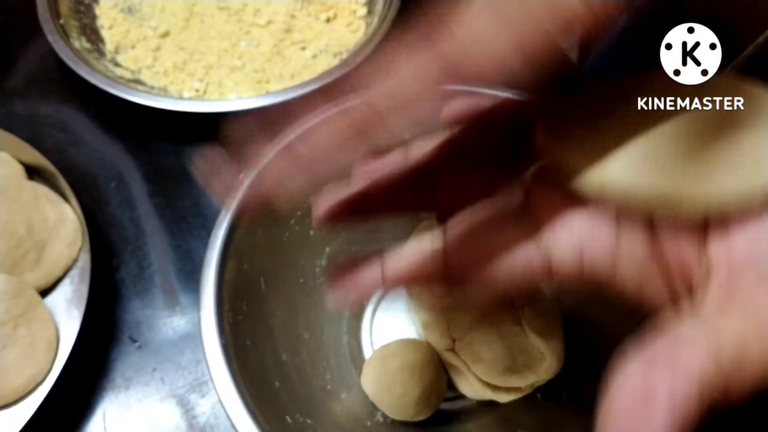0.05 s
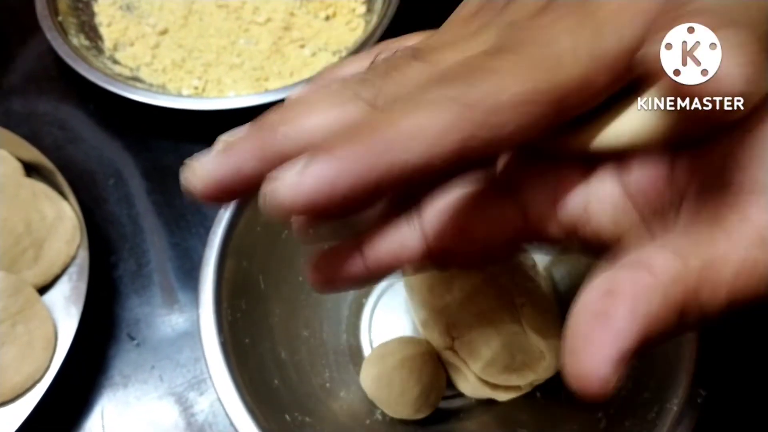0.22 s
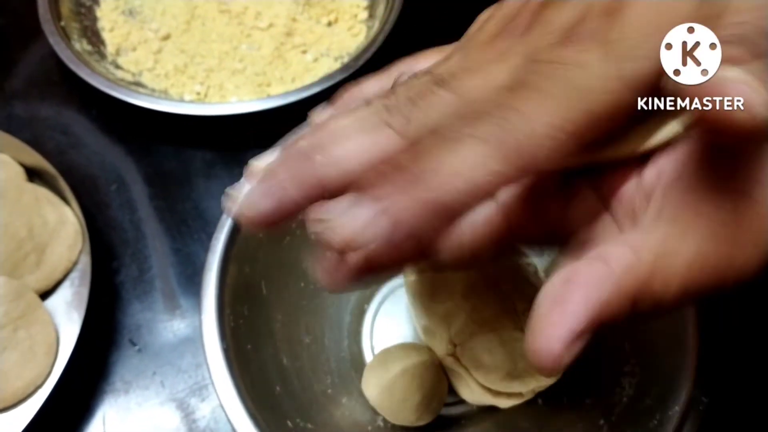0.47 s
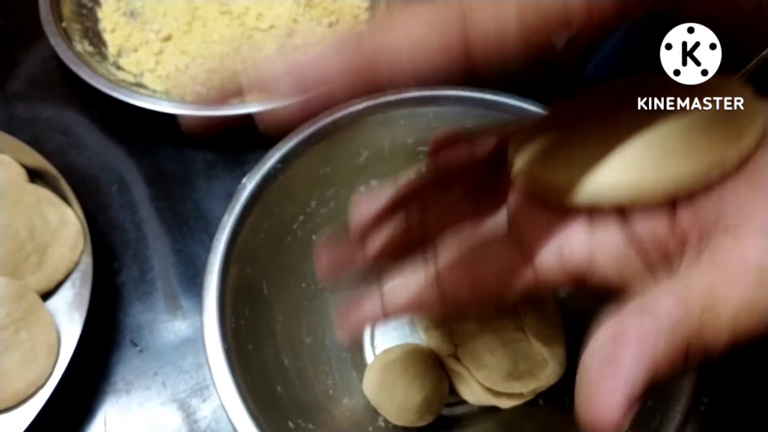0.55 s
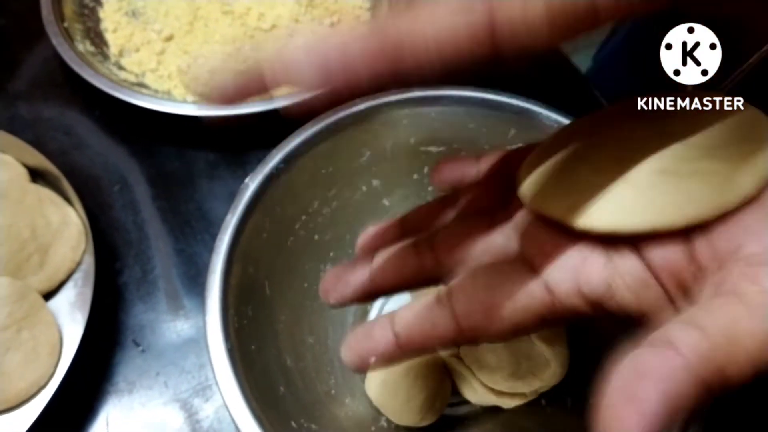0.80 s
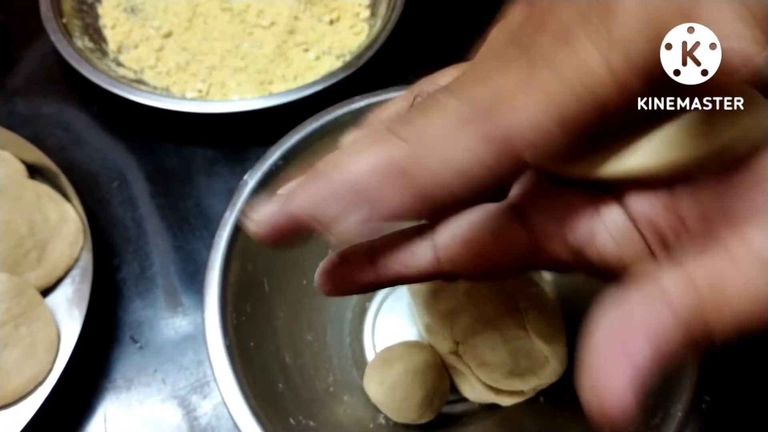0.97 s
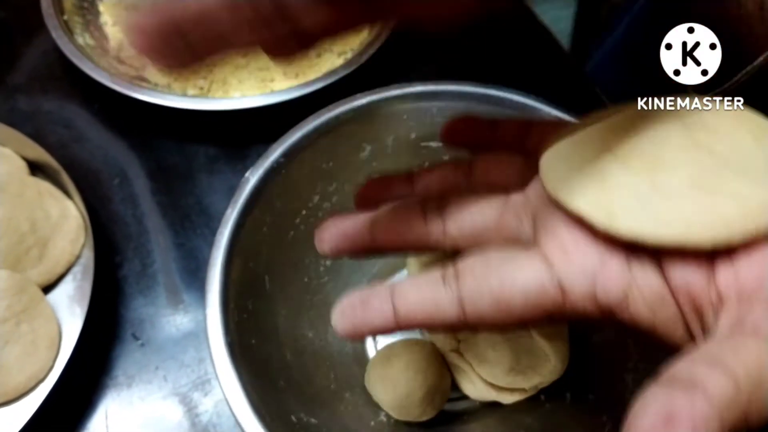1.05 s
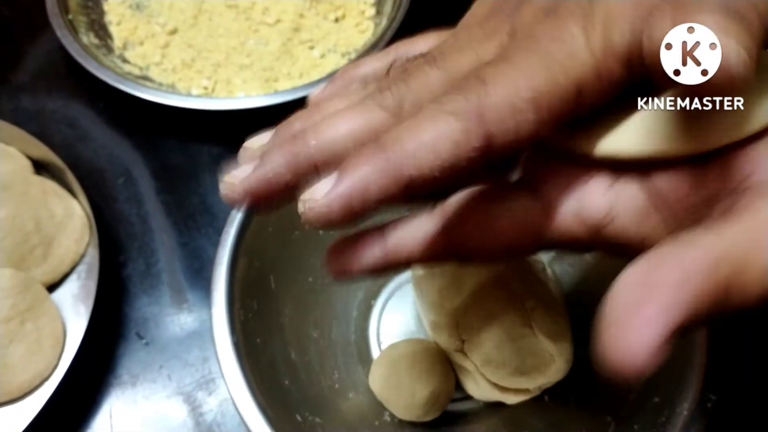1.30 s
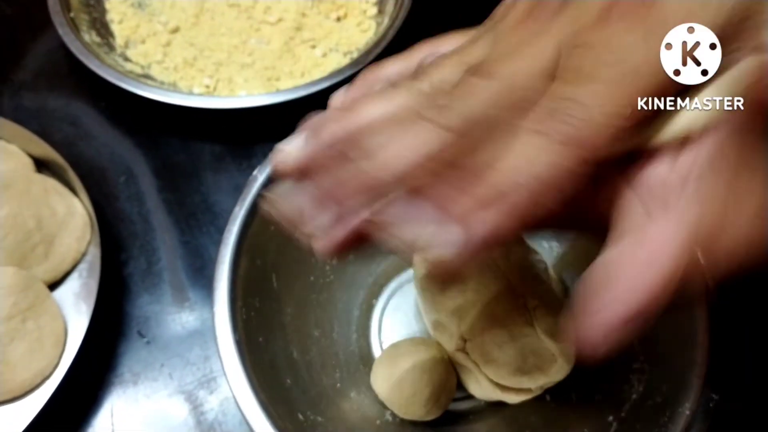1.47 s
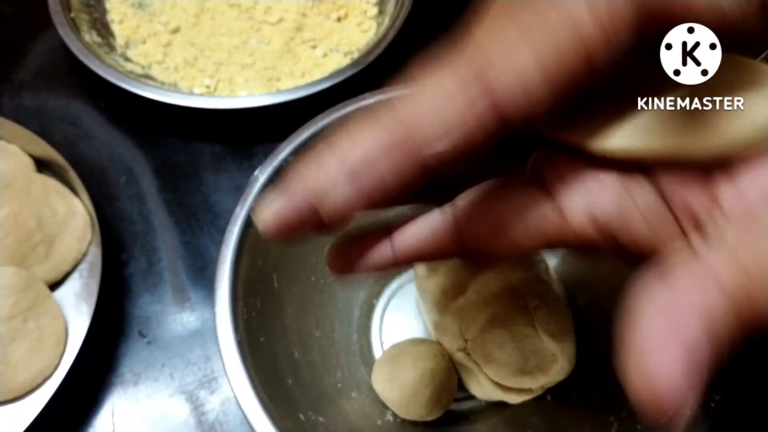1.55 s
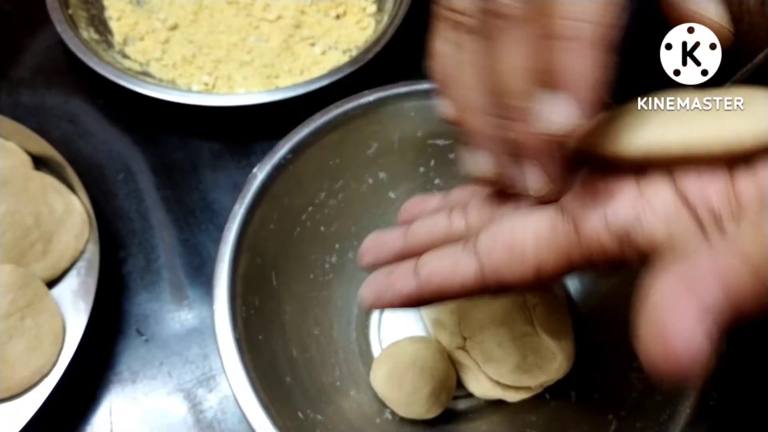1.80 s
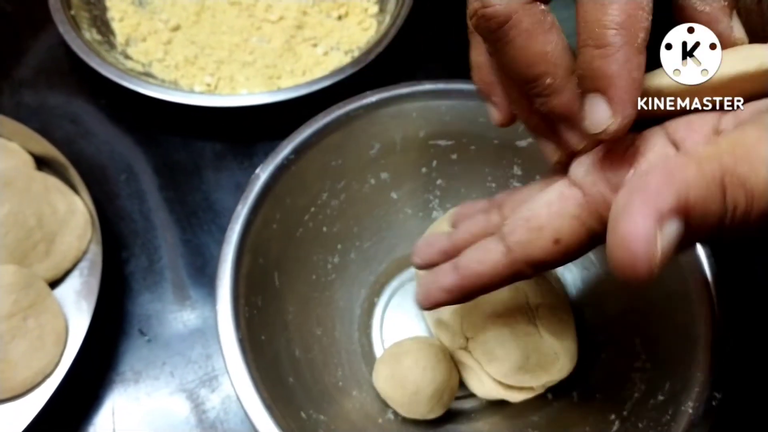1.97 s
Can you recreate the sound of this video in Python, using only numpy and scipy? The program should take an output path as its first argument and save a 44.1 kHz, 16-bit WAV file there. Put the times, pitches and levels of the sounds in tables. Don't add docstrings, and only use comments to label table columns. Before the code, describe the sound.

Hands patting dough close up, airy hollow claps with soft low thumps and short bright room echo

```python
import sys
import numpy as np
from scipy import signal
from scipy.fft import rfft, irfft
from scipy.io import wavfile
from scipy.ndimage import uniform_filter1d

SR = 44100
rng = np.random.default_rng(int(sys.argv[2]) if len(sys.argv) > 2 else 0)


def boost(x):
    u = np.asarray(x, float) / 20
    return 10 ** u


def inscribe(sig):
    pcm = np.round(np.clip(np.atleast_2d(sig).T, -1, 1) * 32767)
    wavfile.write(sys.argv[1], SR, pcm.astype(np.int16))


N = 90404
LEAD = SR // 5

# (frequency [Hz], level [dB per Hz])
HUSH_SPECTRUM = [(150, -6), (330, -0.5), (1300, -12), (2300, -9.5), (4000, -22), (6500, -31.5),
                 (9800, -44.5), (14500, -43)]
# (frequency [Hz], time to fall 60 dB [s])
ROOM_DECAY = [(100, 0.73), (260, 0.32), (700, .36), (1840, 0.32), (4850, 0.39), (12800, 0.27)]
# (frequency [Hz], level [dB])
ROOM_COLOUR = [(100, 5), (200, -2), (350, -4), (1000, 0.5), (2600, 3.5), (4200, -4), (7000, 12),
               (14000, 11)]
# (frequency [Hz], level [dB], time to fall 60 dB [s])
ROOM_MODES = [(284.2, -41, 0.3), (390.5, -20, 0.29), (480.5, -25, 0.36), (720, -18, 0.24)]
# (delay [s], level [dB])
BOUNCES = [(.0035, -14), (.0118, -16), (.0178, -12), (.024, -17)]
# (time [s], thump [dB], air snap [dB], skin slap [dB], skin slap pitch [Hz])
PATS = [
    (-.09, -7, 1.5, -26, 6870),
    (0.2459, -15, -4.5, -10.5, 3890),
    (0.4852, -9, -2, -32, 6050),
    (0.7067, -9, -9.5, -30, 7450),
    (0.9157, -6.5, -2.5, -18, 6260),
    (1.2782, -13.5, -7, -16.5, 4960),
    (1.4950, -9, -1.5, -26, 6800),
]
# (pitch [Hz], width [Hz], share sent to the walls [dB], top crack [dB], low knock [dB])
POCKETS = [(2600, 1860, -4.5, -13.5, -5), (2500, 1220, 5, -26, -16), (2780, 930, 0, -23.5, -8.5),
           (3160, 1080, -1.5, -26.5, -10.5), (2623, 1200, 1, -20.5, -15.5), (2740, 1010, 2, -27, -14.5),
           (2700, 1040, 1, -17.5, -16.5)]
# (skin slap width [Hz], thump pitch [Hz], length of the push [s], snap delay [s])
CONTACTS = [(1510, 276, 0.0011, 0.00063), (1800, 305, 0.0015, 0.0009), (1530, 292, 0.0016, 0.001372),
            (1530, 291, .0016, 0.002), (1910, 330, .0013, 0.000903), (1500, 287, 0.0015, 0.00091),
            (940, 295, 0.0014, 0.00078)]


def table(rows, hz):
    rows = np.array(rows, float)
    return np.interp(np.log(np.maximum(hz, 1)), np.log(rows[:, 0]), rows[:, 1])


def ring(x, hz, width_hz):
    return signal.lfilter(*signal.iirpeak(hz, hz / width_hz, fs=SR), x)


def peak1(x):
    return x / np.abs(x).max()


def walk(rate):
    k = int(SR / rate)
    w = rng.standard_normal(N + 2 * k)
    w = uniform_filter1d(uniform_filter1d(w, k), k)[k:N + k]
    return (w - w.mean()) / w.std()


def hush():
    level_db, sink_db_per_s, flicker_db = -47.5, -0.7, 1.2
    hz = np.arange(N // 2 + 1) * SR / N
    air = 0
    for lo in 75 * 2 ** np.arange(8):
        octave = boost(table(HUSH_SPECTRUM, hz)) * (hz >= lo) * (hz < 2 * lo)
        band = irfft(rfft(rng.standard_normal(N)) * octave, N)
        air = air + boost(flicker_db * walk(7)) * band
    return boost(level_db + sink_db_per_s * np.arange(N) / SR) * air / air.std()


def motor_rumble():
    rumble_hz, width_hz, level_db = 121, 30, -56
    rumble = ring(rng.standard_normal(N), rumble_hz, width_hz)
    rumble = ring(rumble, rumble_hz, width_hz)
    return boost(level_db) * rumble / rumble.std()


def rustle():
    time_s, length_s, level_db = 1.98, 0.012, -69.5
    swell = np.exp(-((np.arange(N) / SR - time_s) / length_s) ** 2)
    brush = ring(rng.standard_normal(N), 13000, 5600) * swell
    return boost(level_db) * brush


def room():
    late_db, late_stretch = -26.5, 3.56
    start_s, rise_s = .0055, .004
    t = np.arange(SR) / SR
    tail = 0
    for hz in 80 * 2 ** (np.arange(24) / 3):
        t60 = table(ROOM_DECAY, hz)
        band = ring(rng.standard_normal(len(t)), hz, hz / 4) / np.sqrt(np.pi / 2)
        fade = boost(-60 * t / t60) + boost(late_db - 60 * t / t60 / late_stretch)
        tail = tail + boost(table(ROOM_COLOUR, hz)) * band * fade
    for hz, db, t60 in ROOM_MODES:
        tail = tail + boost(db - 60 * t / t60) * np.sin(2 * np.pi * hz * t)
    rise = 1 - np.exp(-np.maximum(t - start_s, 0) / rise_s)
    return tail * rise / np.sqrt(SR / 100)


def dough_thump(t, thump_hz, push_s):
    width_hz, upper_hz, upper_db = 147, 574, -26.5
    push = np.diff(-np.sin(np.pi * np.clip(t / push_s, 0, 1)) ** 2, prepend=0)
    upper = boost(upper_db) * ring(push, upper_hz, width_hz)
    return peak1(ring(push, thump_hz, width_hz) + upper)


def air_swell(late, fall_s):
    return (1 - np.exp(-late / .0002)) * np.exp(-late / fall_s)


def air_burst(late, late_s, noise):
    burst = boost(-22) * noise * air_swell(late, .0006)
    burst[int(late_s * SR)] += 1
    return burst


def struck(burst, hz, width_hz):
    return peak1(ring(ring(burst, hz, width_hz), hz, 1.5 * width_hz))


def pocket_glide(late, pocket_hz):
    glide, glide_s, top, ring_s = 0.65, 0.0009, 1.275, 0.00082
    turns = top * pocket_hz * (late - glide * glide_s * (1 - np.exp(-late / glide_s)))
    soft_start = 1 - np.exp(-late / 0.00028)
    return peak1(np.sin(2 * np.pi * turns) * air_swell(late, ring_s) * soft_start)


def finger_scatter(t, noise):
    late_s, fall_s = .0018, .0022
    spray = noise[::-1] * (t / late_s) ** 2 * np.exp(-t / fall_s * 2)
    return spray / np.sqrt(np.sum(spray ** 2))


def pat(levels, pocket, contact, noise):
    thump_db, snap_db, skin_db, skin_hz = levels
    pocket_hz, pocket_width_hz, air_db, knock_db = pocket
    skin_width_hz, thump_hz, push_s, late_s = contact
    t = np.arange(len(noise)) / SR
    late = np.maximum(t - late_s, 0)
    burst = air_burst(late, late_s, noise)

    knock = boost(knock_db) * struck(burst, 1500, 1540)
    low = boost(thump_db) * dough_thump(t, thump_hz, push_s) - knock
    crack = boost(air_db) * struck(burst, 15400, 5700)
    slap = boost(skin_db) * struck(burst, skin_hz, skin_width_hz)
    high = crack - slap
    pop = boost(snap_db) * struck(burst, pocket_hz, pocket_width_hz)
    glide = boost(snap_db) * pocket_glide(late, pocket_hz)

    spray = finger_scatter(t, noise)
    pop_spray = boost(-3) * np.convolve(pop, spray)[:len(t)]
    high_spray = boost(4.5) * np.convolve(high, spray)[:len(t)]
    tick = boost(-12) * high
    near = low + glide + pop_spray + tick + high_spray
    return near, low + high + pop


def scene():
    room_db = -8
    near, sent = np.zeros(N + 2 * LEAD), np.zeros(N + 2 * LEAD)
    noises = rng.standard_normal((len(PATS), 1500))
    for (s, *levels), pocket_row, contact, noise in zip(PATS, POCKETS, CONTACTS, noises):
        hz, width_hz, send_db, air_db, knock_db = pocket_row
        close, far = pat(levels, (hz, width_hz, air_db, knock_db), contact, noise)
        i = LEAD + int(s * SR)
        near[i:i + len(close)] += close
        sent[i:i + len(far)] += far * boost(send_db)
    heard = near + boost(room_db) * signal.fftconvolve(sent, room())[:len(near)]
    for lag, db in BOUNCES:
        heard = heard + boost(db) * np.roll(near, int(lag * SR))
    return (heard[LEAD:LEAD + N] + hush() + motor_rumble() + rustle())[None]


def band_limit(x):
    return signal.sosfilt(signal.butter(12, 16520, fs=SR, output="sos"), x)


def record(dry):
    low_cut_hz, top_hz = 105, 15550
    rounding, lopsided = 1.1, .025
    x = signal.sosfilt(signal.butter(4, low_cut_hz, "high", fs=SR, output="sos"), dry)
    x = np.tanh(rounding * x) / rounding + lopsided * x ** 2
    x = signal.sosfilt(signal.ellip(8, .3, 40, top_hz, fs=SR, output="sos"), x)
    return band_limit(x)


dry = scene()
out = record(dry)
inscribe(out)
```